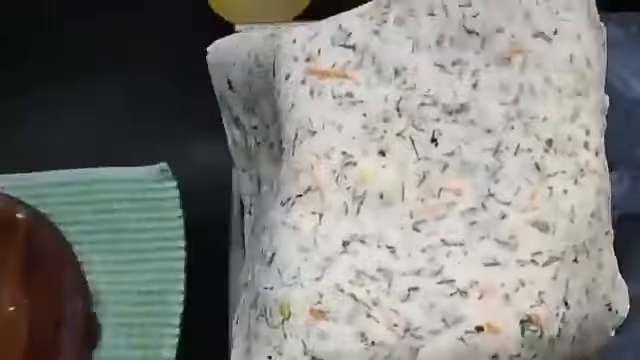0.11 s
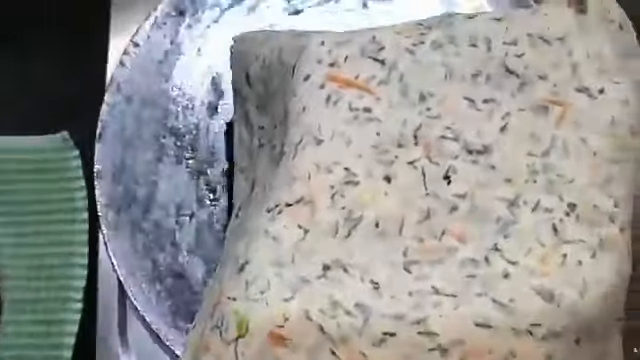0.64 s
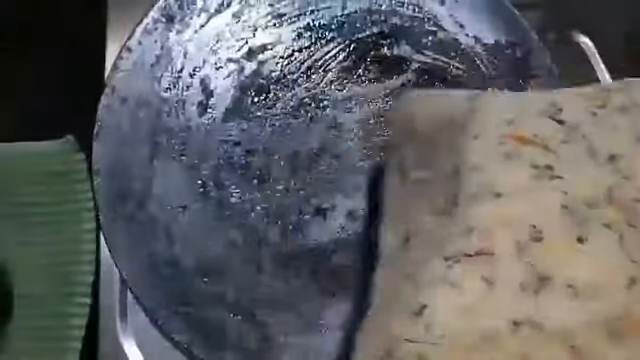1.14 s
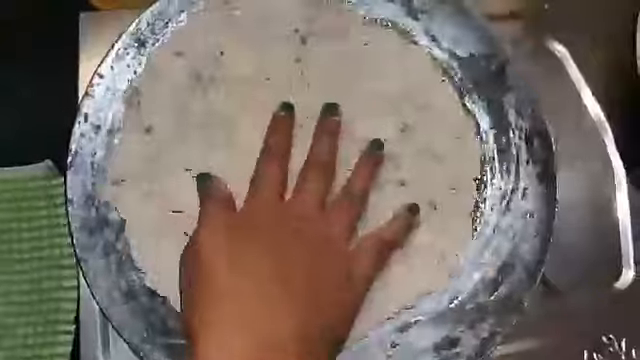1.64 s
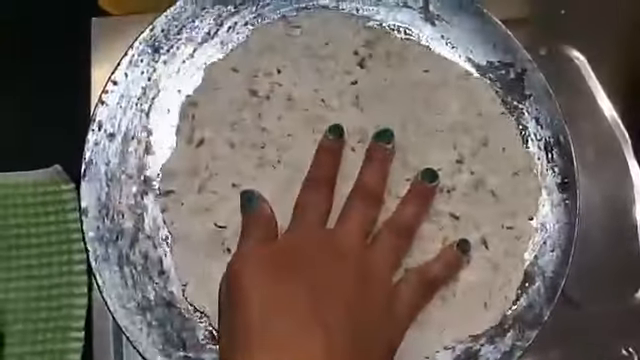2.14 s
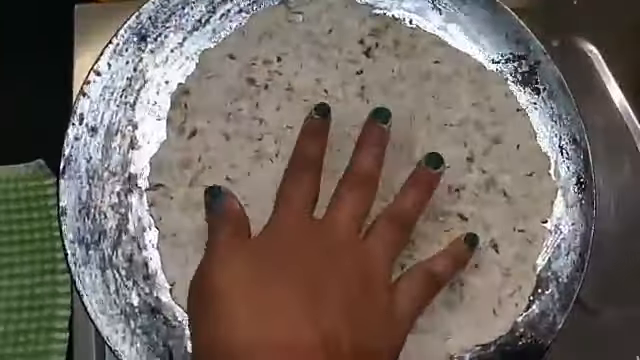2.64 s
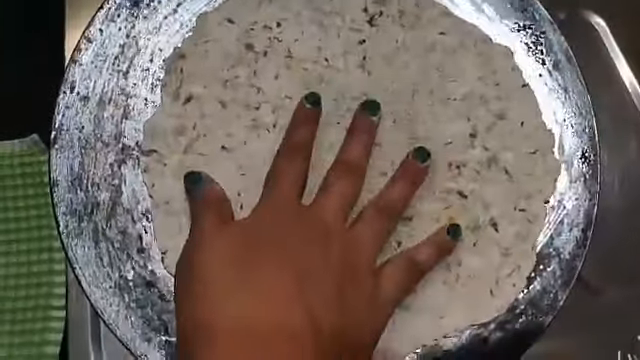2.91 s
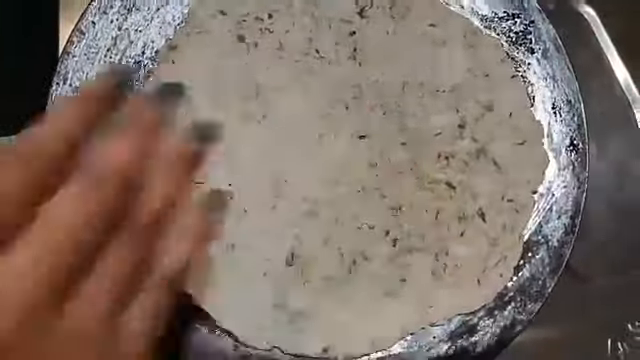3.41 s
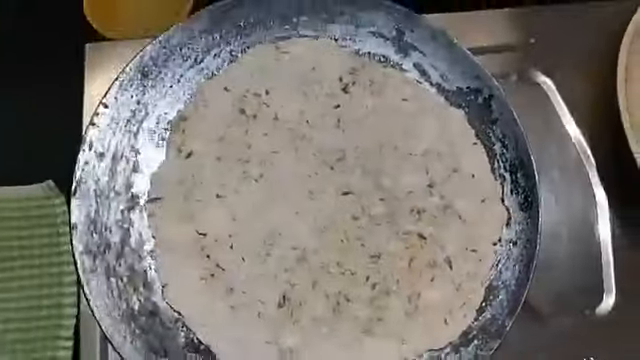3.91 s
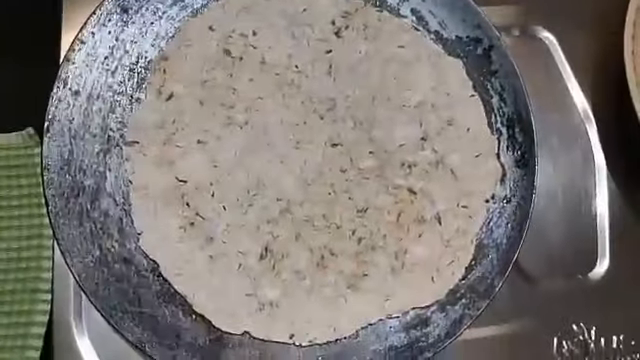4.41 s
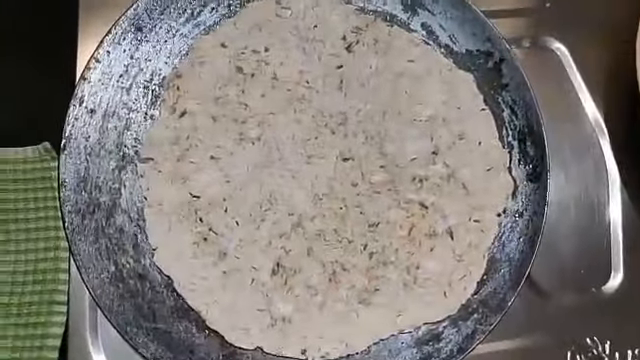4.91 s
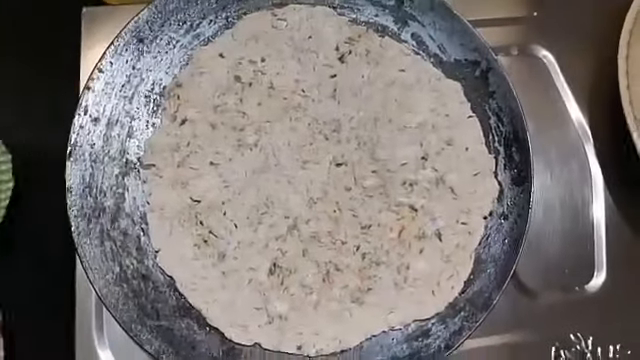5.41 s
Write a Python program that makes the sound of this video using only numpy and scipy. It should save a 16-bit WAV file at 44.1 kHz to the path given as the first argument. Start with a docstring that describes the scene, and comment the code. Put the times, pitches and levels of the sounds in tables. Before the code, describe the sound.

A soft, moist dough round slaps loudly onto a hot metal griddle, sizzles strongly under a pressing hand, then simmers faintly before a few counter knocks.

```python
"""In a small kitchen moist dough is slapped onto a hot iron griddle and pressed by hand.
The blow joins a noise crack, decaying iron modes and a dense echo; steam is random pops and spits.
Cloth rustles and a small scrape ticks beforehand; knocks on the counter come mostly afterwards.
Filtered noise makes the cloth, the low room hum and the draught; faint wavering sines come from afar.
Two microphone ports of a handheld device hear it, the left favouring the highest treble."""
import sys
import numpy as np
from scipy import signal
from scipy.fft import rfft, irfft, next_fast_len
from scipy.io import wavfile
from scipy.ndimage import uniform_filter1d

SR = 44100
rng = np.random.default_rng(int(sys.argv[2]) if len(sys.argv) > 2 else 0)


def materialize(psi):
    """Save the field psi as 16-bit PCM at rate SR to the path in sys.argv[1].

    A 1-D psi becomes a single channel; in a 2-D psi each row is a channel.
    """
    bounded = np.clip(np.atleast_2d(psi).T, -1, 1)
    quanta = np.round(bounded * 32767).astype(np.int16)
    wavfile.write(sys.argv[1], SR, quanta)


def voltage_ratio(decibels):
    """Convert decibels (scalar or array-like) to amplitude ratios, 20 dB per decade."""
    exponent = np.asarray(decibels, float) / 20
    return 10 ** exponent


N = 244314  # samples

# Smooth room floor: (frequency [Hz], relative level per Hz [dB])
FLOOR_SPECTRUM = [(26, -36), (45, -7), (70, -3.5), (135, -0.5), (200, -8), (281, -5.5), (396, -11),
                  (631, -14.5), (695, -13), (1130, -16), (2190, -16), (5040, -21.5), (13700, -22),
                  (15500, -30)]
FLOOR_DB = -56
# Low room resonances that colour the hum: (frequency [Hz], width [Hz], relative level [dB])
HUM_RESONANCES = [(112.5, 14.8, 3.5), (157, 3.8, 8), (293.6, 48, -5.5)]
# Swells of the hum: (start [s], rise [s], hold [s], level [dB])
HUM_SWELLS = [(-.02, 0.013, 0.057, -53), (.7, 0.21, 0.18, -58), (2.4, 0.42, 0.072, -54.5),
              (4.3, 0.27, 0.046, -57.5), (5.35, 0.096, .1, -48.5)]
HUM_DB, HUM_FALL_DB_PER_S = -63.5, 27
# Faint tones from afar: (start [s], end [s], frequency [Hz], level [dB])
FAR_TONES = [(2.2, 2.497, 758, -65.5), (2.55, 2.906, 826, -72), (3.65, 4.24, 533, -69), (4.15, 5, 825, -72)]
# Air pushed over the ports by the swinging dough and hand: (start [s], rise [s], hold [s], level [dB])
AIR_GUSTS = [(.2, .3, 0.04, -61), (1.1, 0.23, 0.048, -44), (2.36, 0.092, 0.31, -56.5),
             (4.9, 0.22, 0.055, -63)]
STILL_AIR_DB, GUST_FALL_DB_PER_S = -66.5, 110

# Strokes of cloth and hand: (start [s], rise [s], hold [s], rub level [dB], hiss over rub [dB])
CLOTH_STROKES = [(-.05, 0.049, .07, -50, -2), (.535, 0.033, .02, -60.5, 5), (0.795, .02, .01, -78, 13),
                 (1.162, 0.064, .02, -58, -6)]
# Dull rub of the cloth: (frequency [Hz], relative level per Hz [dB])
RUB_SPECTRUM = [(200, -17), (450, -9), (650, -3), (900, -10.5), (1200, -19), (2000, -13), (4000, -32)]
# Thin hiss of the cloth: (frequency [Hz], relative level per Hz [dB])
HISS_SPECTRUM = [(1500, -11), (3000, 1), (7000, 0.5), (8100, 3), (8300, 6), (8500, 1), (9400, -4),
                 (9600, 13), (9800, -3), (14000, -21)]
CLOTH_FALL_DB_PER_S = 75
# A small scrape in two ticks: (time [s], level [dB], centre frequency [Hz], t60 [s])
SCRAPE_TICKS = [(0.811, -45.5, 2340, 0.073), (.832, -49, 2560, 0.058)]

# Steam squeezed out by the hand, then escaping pockets: (start [s], rise [s], hold [s], level [dB])
STEAM_SURGES = [(1.5, 0.086, 0.76, -38), (2.13, 0.059, 0.11, -42), (2.553, 0.013, 0.29, -38.5),
                (3.71, 0.036, .01, -54), (3.8, .02, 0.046, -51.5), (4.1, .15, .2, -52.5),
                (4.61, .03, 0.56, -54)]
SIMMER_DB, STEAM_SAG_DB_PER_S, STEAM_FALL_DB_PER_S = -49, 10.5, 80
BRIGHTEN = 0.034  # tilt [dB per octave] for each dB above the simmer
# Steam noise: (frequency [Hz], relative level per Hz [dB])
STEAM_SPECTRUM = [(290, -17), (500, -15.5), (686, -13), (815, 8), (888, -22.5), (1350, -8.5), (4020, -5),
                  (4700, -8), (7130, 0), (14200, -4.5), (15500, -7)]
# Loud spits of steam and, in the last row, the bright click of a knock on the counter:
# (time [s], relative level [dB], centre frequency [Hz], left over right [dB])
BRIGHT_CLICKS = [(1.556, -30, 13600, 3.5), (1.6299, -30, 12700, -15), (1.883, -31, 9000, -11),
                 (2.014, -32, 11000, -2), (2.038, -30.5, 11000, -1), (2.1563, -29, 8380, -5),
                 (2.1763, -34, 7290, -5), (2.2163, -27.5, 8560, -2), (2.235, -30, 13000, -4),
                 (2.288, -32.5, 8000, -4), (2.4768, -36, 7120, 2.5), (2.544, -33.5, 6970, -4),
                 (2.5673, -27, 12300, -1), (2.9703, -36, 7110, -12), (3.3747, -39.5, 7490, -10),
                 (3.736, -34, 13700, 8), (3.8143, -34, 12000, 5), (4.151, -28.5, 14200, -2),
                 (4.293, -35, 14200, -4), (4.641, -38, 11000, 3.5), (4.701, -41, 7870, -5),
                 (4.902, -31.5, 7400, -3), (5.166, -29.5, 9500, 3)]

# Knocks on the counter: (time [s], relative level [dB], tilt [dB per octave],
# weight on the counter [dB], echo over crack [dB])
COUNTER_KNOCKS = [(.232, -38.5, -8, -32, -3), (5.146, -25.5, -3.5, 0, 7), (5.177, -20.5, -5, -6, -0.5),
                  (5.19, -31, -3.5, -18, 6), (5.215, -36, 2, -18, 8), (5.277, -33, -0.5, -21.5, 7.5),
                  (5.422, -21.5, 6, -25, 7), (5.424, -28.5, -7, -23, 9.5), (5.46, -32.5, 5, -2, 9)]
# Crack of a knock: (frequency [Hz], relative level per Hz [dB])
KNOCK_SPECTRUM = [(100, -68), (250, -11), (420, -10), (950, -3.5), (1700, -4.5), (2500, -3), (3000, -8.5),
                  (7500, -11), (12000, -23)]
# Modes of the counter: (frequency [Hz], relative level [dB], t60 [s])
COUNTER_MODES = [(107.3, 0, 0.7), (112.8, 0, 0.7), (276.5, -6, 0.24), (472, -10, 0.13), (947, -10, 0.047)]
# Parts of the dough landing on the iron: (time [s], relative level [dB], tilt [dB per octave],
# weight on the iron [dB], echo over crack [dB])
DOUGH_SLAPS = [(1.275, -0.5, -1.5, -10, -8.5), (1.282, 0, -1, -4, 2.5), (1.327, -4, 3.5, 1.5, 4.5),
               (1.34, -14.5, 4, -2, -5), (1.374, -13, 2.5, -20, -16), (1.414, -20, 3.5, 2.5, -2)]
# Crack of a slap: (frequency [Hz], relative level per Hz [dB])
SLAP_SPECTRUM = [(35, -33), (60, -15), (201, -8.5), (231, -6), (298, -5.5), (335, -5.5), (533, -16),
                 (627, -6.5), (999, -6.5), (1200, -12.5), (1830, -4.5), (3670, -11), (8870, -11),
                 (14500, -27), (15500, -26)]
# Modes of the griddle: (frequency [Hz], relative level [dB], t60 [s])
IRON_MODES = [(150.5, -6.5, 0.56), (261, 1, 0.61), (297.7, -2.5, 0.84), (306.4, -1, 0.59), (344, -22, 0.37),
              (413, -15, .5), (865, -4.5, 0.26), (984, -10, 0.2), (1330, -20, 1), (2200, -23, 0.21),
              (2450, -2, 0.37)]
# Part of a crack that is independent in each port: (frequency [Hz], gain [dB])
CRACK_ASIDE = [(300, -3.5), (1200, 11), (6000, 9)]
# Decay of the kitchen, before each kind of blow takes its share: (frequency [Hz], t60 [s])
KITCHEN_DECAY = [(120, 0.44), (330, 0.54), (870, 0.45), (2300, 0.48), (6060, 0.41)]

# Likeness of the ports in diffuse sound: (frequency [Hz], correlation [1])
PORT_LIKENESS = [(60, 0.87), (130, 0.99), (290, 0.94), (640, 0.58), (1410, -0.24), (3100, -0.021),
                 (6820, -0.088), (15000, 0.081)]
# Colour of the ports: (frequency [Hz], left over right [dB])
PORT_COLOUR = [(60, -6), (200, 2), (400, -1), (1200, 1), (2400, 2), (3400, 1), (5000, -1.5), (7200, -8.5),
               (8500, -2.5), (10400, 10), (12500, 13.5), (14400, 13.5)]
LAG = 10  # samples by which the left port hears the stove later
EDGE_HZ = 15650  # upper band limit


def evened(x):
    """Normalization: scales to rms 1."""
    return x / np.sqrt(np.mean(x ** 2) + 1e-20)


def read(points, hz):
    """Interpolation of a table along log frequency, held constant above 14.4 kHz."""
    f, value = np.transpose(points)
    return np.interp(np.log(np.minimum(hz, 14400) + 1), np.log(f + 1), value)


def add(mix, s, sound):
    """Superposition: adds a sound into the mix from time s."""
    part = mix[..., round(s * SR):][..., :sound.shape[-1]]
    part += sound[..., :part.shape[-1]]


def octaves(hz):
    """Logarithmic pitch: octaves from 3 kHz, with frequencies below 100 Hz held there."""
    return np.log2(np.maximum(hz, 100) / 3000)


def diffuse(field_db, size, length=N):
    """Diffuse field: noise shaped by field_db(hz, t), its port correlation set by frequency."""
    hz = np.fft.rfftfreq(size, 1 / SR)[:, None]
    t = np.arange(4 * length // size + 5) * size / 4 / SR
    a, b, c, d = rng.standard_normal((len(t), len(hz), 4)).T
    common, other = a + 1j * b, c + 1j * d
    same = np.clip(read(PORT_LIKENESS, hz), -1, 1)
    z = np.array([common, same * common + np.sqrt(1 - same ** 2) * other])
    z = z * voltage_ratio(field_db(hz, t))
    return signal.istft(z, nperseg=size, noverlap=size * 3 // 4)[1][:, :length]


def coloured(x, gain_db):
    """Linear filtering: multiplies the spectrum by a smooth gain gain_db(hz)."""
    size = next_fast_len(x.shape[-1] + 512)
    gain = voltage_ratio(gain_db(np.fft.rfftfreq(size, 1 / SR)))
    return irfft(rfft(x, size) * gain, size)[..., :x.shape[-1]]


def ports(x):
    """Path difference: a near source reaches the right port first."""
    return np.array([np.roll(x, LAG), x])


def swells(rows, t, base_db, fall_db_per_s, sag_db_per_s=0):
    """Addition of powers: a steady level plus events that rise, hold while sagging, then fall."""
    power = voltage_ratio(2 * base_db) + 0 * t
    for start, rise, hold, db in rows:
        since = np.maximum(t - start - rise, 0)
        sag_db = sag_db_per_s * np.minimum(since, hold)
        fall_db = fall_db_per_s * np.maximum(since - hold, 0)
        onset = np.clip((t - start) / rise, 0, 1)
        power = power + (onset * voltage_ratio(db - sag_db - fall_db)) ** 2
    return np.sqrt(power)


def far_tones():
    """Frequency and amplitude modulation: distant sines waver slowly in pitch and level."""
    tones = np.zeros(N)
    for start, end, hz, db in FAR_TONES:
        n = round((end - start) * SR)
        waver = 0.0013 * evened(uniform_filter1d(rng.standard_normal(n), 3000))
        broken_db = 3.5 * evened(uniform_filter1d(rng.standard_normal(n), 2500))
        phase = 2 * np.pi * np.cumsum(hz * (1 + waver)) / SR
        add(tones, start, voltage_ratio(db + broken_db) * np.sin(phase) * signal.windows.tukey(n, .6))
    return tones


def room():
    """Room resonance: diffuse noise forms a smooth floor and, in low resonances, a swelling hum."""
    def resonances(hz, s):
        power = sum(voltage_ratio(2 * db) / (1 + (2 * (hz - f) / w) ** 4) for f, w, db in HUM_RESONANCES)
        return 10 * np.log10(power) + 0 * s

    floor = evened(diffuse(lambda hz, s: read(FLOOR_SPECTRUM, hz) + 0 * s, size=2048))
    hum = evened(diffuse(resonances, size=4096))
    hum = hum * swells(HUM_SWELLS, np.arange(N) / SR, HUM_DB, HUM_FALL_DB_PER_S)
    return voltage_ratio(FLOOR_DB) * floor + hum


def draught():
    """Flow noise: moving air makes lumpy sub-bass, partly shared between the ports."""
    gusts = rng.standard_normal((2, N)) + 2.0 * rng.standard_normal(N)
    low = coloured(gusts, lambda hz: -18.0 * np.log2((hz + 1) / 25) ** 2)
    return evened(low) * swells(AIR_GUSTS, np.arange(N) / SR, STILL_AIR_DB, GUST_FALL_DB_PER_S)


def rustle():
    """Sliding friction: cloth gives a dull rub and a thin hiss, each a band of diffuse noise."""
    t = np.arange(N) / SR
    rub_rows = [row[:4] for row in CLOTH_STROKES]
    hiss_rows = [(*row[:3], row[3] + row[4]) for row in CLOTH_STROKES]
    rub = swells(rub_rows, t, -120, CLOTH_FALL_DB_PER_S)
    hiss = swells(hiss_rows, t, -120, CLOTH_FALL_DB_PER_S)
    low = evened(diffuse(lambda hz, s: read(RUB_SPECTRUM, hz) + 0 * s, size=512))
    high = evened(diffuse(lambda hz, s: read(HISS_SPECTRUM, hz) + 0 * s, size=512))
    return low * rub + high * hiss


def ticks():
    """Sliding friction: short narrow-band bursts of rubbing noise decay exponentially."""
    out, t = np.zeros((2, N)), np.arange(4000) / SR
    for s, db, hz, t60 in SCRAPE_TICKS:
        noise = rng.standard_normal((2, len(t)))
        rub = coloured(noise, lambda f: -60.0 * np.log2((f + 1) / hz) ** 2)
        add(out, s, evened(rub) * voltage_ratio(db - 60 * t / t60) * (1 - np.exp(-t / 0.0012)))
    return out


def fizz():
    """Random pulse train: thousands of steam bubbles burst per second in flurries, over a hiss."""
    def steam(at):
        return swells(STEAM_SURGES, at, SIMMER_DB, STEAM_FALL_DB_PER_S, STEAM_SAG_DB_PER_S)

    t = np.arange(N) / SR
    flurry = evened(uniform_filter1d(rng.standard_normal(N), 500))
    size = voltage_ratio(2.66 * np.minimum(rng.exponential(1, N), 5.5) + 2.3 * flurry)
    size = size * (rng.random(N) < 4000 / SR)  # 4000 bubbles per second on average
    pops = size * rng.standard_normal((2, N))  # each port hears its own mix
    pops = pops + 1.05 * ports(size * rng.standard_normal(N))
    hiss = 1.25 * rng.standard_normal((2, N))
    hz, at, z = signal.stft(evened(pops + hiss), SR, nperseg=256)
    tilt_db = BRIGHTEN * (20 * np.log10(steam(at)) - SIMMER_DB)  # stronger steam is brighter
    shape = voltage_ratio(read(STEAM_SPECTRUM, hz)[:, None] + tilt_db * octaves(hz / 3)[:, None])
    shape /= np.sqrt((shape ** 2).mean(0))
    sound = signal.istft(z * shape, SR, nperseg=256)[1][:, :N]
    onset = np.clip((t - DOUGH_SLAPS[0][0]) / 0.2, 0, 1)  # begins as the dough lands
    return sound * steam(t) * onset


def bright_clicks(rows):
    """Impulsive radiation: a wide click of noise with a short hissing tail."""
    out, t = np.zeros((2, N)), np.arange(3000) / SR
    for s, db, hz, pan_db in rows:
        burst = rng.standard_normal((2, len(t))) * (np.exp(-t / 0.00083) + 0.16 * np.exp(-t / 0.05))
        puff = coloured(2.5 * burst + ports(burst[0]),
                        lambda f: read(STEAM_SPECTRUM, f) - 7.0 * np.log2((f + 1) / hz) ** 2)
        size = np.linalg.norm(puff[:, :150], axis=1, keepdims=True)  # strength of the click
        add(out, s, voltage_ratio(db + 13 + np.array([[.5], [-.5]]) * pan_db) * puff / size)
    return out


def spits():
    """Bubble collapse: bigger bubbles of steam snap one by one."""
    return bright_clicks(BRIGHT_CLICKS[:-1])


def ringing(modes, t, push_s):
    """Modal superposition: a struck body sounds as a sum of exponentially damped sines."""
    spot_db = 1.2 * rng.standard_normal(len(modes))  # each spot drives the modes differently
    ring = np.zeros(len(t))
    for k, ((hz, mode_db, t60), p) in enumerate(zip(modes, spot_db)):
        sign = (-1) ** k  # neighbouring modes start opposed
        ring += sign * voltage_ratio(mode_db + p - 60 * t / t60) * np.sin(2 * np.pi * hz * t)
    return ring * (1 - np.exp(-t / push_s))


def blows(rows, colour, modes, crack_s, push_s, ring_db, echo_share):
    """Impact: a noise crack, the ringing of the struck body and the kitchen's dense echo."""
    out, t = np.zeros((2, N)), np.arange(SR * 3 // 4) / SR
    for s, db, tilt_db, weight_db, echo_db in rows:
        def tone(hz):
            return read(colour, hz) + tilt_db * octaves(hz)

        def decay(hz, at):
            return tone(hz) - 60 * at / (echo_share * read(KITCHEN_DECAY, hz))

        burst = rng.standard_normal((2, len(t))) * (1 - np.exp(-t / 0.00066)) * np.exp(-t / crack_s)
        aside = coloured(burst, lambda hz: read(CRACK_ASIDE, hz))
        crack = coloured(aside + ports(burst[0]), tone)
        echo = diffuse(decay, size=512, length=len(t))
        echo *= (1 - np.exp(-t / 0.0039)) * np.linalg.norm(crack) / np.linalg.norm(echo)
        echo *= voltage_ratio(0.63 * np.array([[1], [-1]]))  # the left port faces the walls more
        scale = np.linalg.norm(crack) / np.sqrt(crack_s * SR)
        air = (crack + voltage_ratio(echo_db) * echo) / scale
        ring = voltage_ratio(ring_db + weight_db) * ringing(modes, t, push_s)
        add(out, s, voltage_ratio(db - 7) * (air + ring))
    return out


def knocks():
    """Impact on the counter: brief cracks over slowly built low modes, one with a bright click."""
    struck = blows(COUNTER_KNOCKS, KNOCK_SPECTRUM, COUNTER_MODES,
                   crack_s=0.002, push_s=0.039, ring_db=-0.5, echo_share=0.74)
    return struck + bright_clicks(BRIGHT_CLICKS[-1:])


def slaps():
    """Impact of soft dough on iron: a longer crack of squeezed air over the griddle's ringing."""
    return blows(DOUGH_SLAPS, SLAP_SPECTRUM, IRON_MODES,
                 crack_s=0.0039, push_s=0.0083, ring_db=-23.0, echo_share=1.0)


def scene():
    """Superposition of all sources, from the background to the slap."""
    background = room() + far_tones() + draught()
    return background + rustle() + ticks() + fizz() + spits() + knocks() + slaps()


def roll_off(x):
    """The treble ends steeply here."""
    return signal.sosfilt(signal.butter(12, 16440, fs=SR, output="sos"), x)


def record(dry):
    """Linear reception: each port has its own colour, both share a band limit, and peaks clip."""
    def response(hz):
        side = np.array([[.5], [-.5]])
        return side * read(PORT_COLOUR, hz) - 45 / (1 + np.exp((EDGE_HZ - hz) / 60))

    heard = coloured(dry, response)
    return roll_off(np.clip(heard, -1, 1))


dry = scene()
out = record(dry)
materialize(out)
```